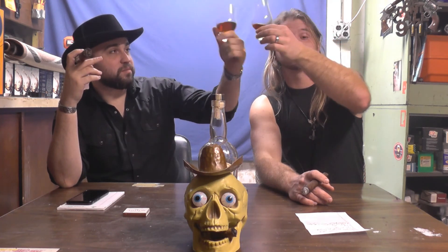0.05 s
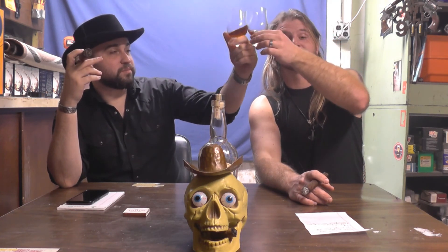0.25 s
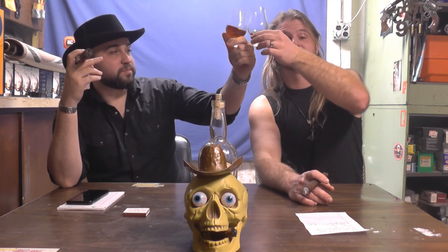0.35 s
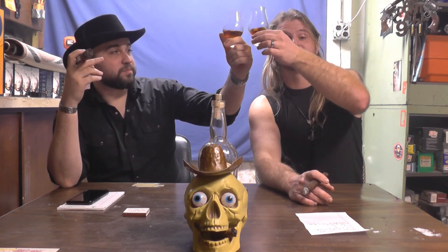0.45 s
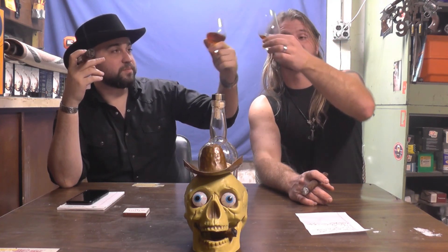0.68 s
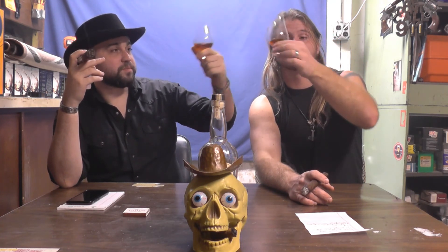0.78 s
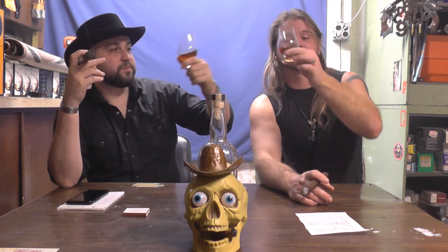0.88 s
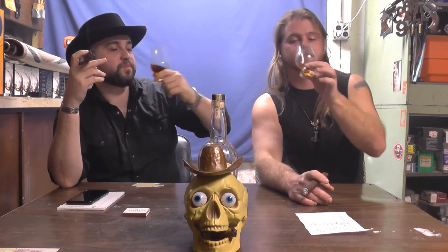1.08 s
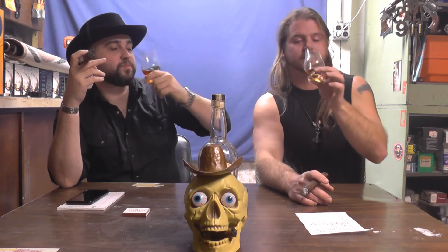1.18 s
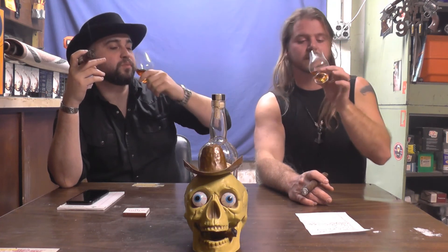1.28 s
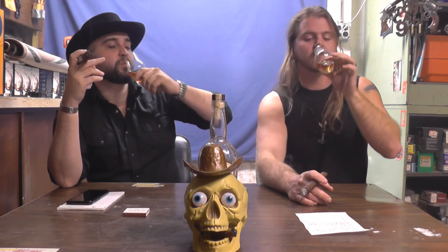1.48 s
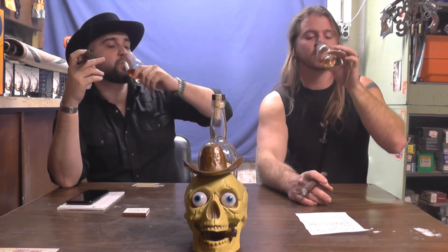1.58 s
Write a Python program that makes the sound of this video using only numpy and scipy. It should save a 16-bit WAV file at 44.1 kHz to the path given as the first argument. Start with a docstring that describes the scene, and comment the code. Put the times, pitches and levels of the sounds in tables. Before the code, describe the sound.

Quiet room tone, then one crisp clink of drinking glasses with short room echoes; the clear, beating ring slowly dies and sags slightly, with a dull low rumble of movement and a faint late tick, in stereo.

```python
"""A small room's tone comes first and runs throughout, in stereo: coloured noise. Then two stemmed tasting
glasses clink once: a noise crack with a damped clack, a bright shimmer of high sines, a long beating ring of
sines, and a wash of room echoes. Each long partial swells and fades as the glasses are drawn apart through the
room's standing waves, and sags, the lowest ones most, as they are tipped. After the clink a soft low rumble of
the drinkers' movement rises, and late on comes a faint noise tick as a glass is handled."""
import sys
import numpy as np
from scipy.fft import rfft, irfft, next_fast_len
from scipy.io import wavfile
from scipy.ndimage import map_coordinates

SR = 44100
rng = np.random.default_rng(int(sys.argv[2]) if len(sys.argv) > 2 else 0)


def materialize(psi):
    """Save the field psi as 16-bit PCM at rate SR to the path in sys.argv[1].

    A 1-D psi becomes a single channel; in a 2-D psi each row is a channel.
    """
    bounded = np.clip(np.atleast_2d(psi).T, -1, 1)
    quanta = np.round(bounded * 32767).astype(np.int16)
    wavfile.write(sys.argv[1], SR, quanta)


N = 72765  # samples, 1.65 s
CLINK_S = 0.2297
DRIFT_RAD, DRIFT_PER_S = 0.55, 6  # phase wander of every glass partial: depth, random knots a second


def amp(db):
    """Decibels to gain."""
    return 10 ** (np.asarray(db) / 20)


def unit(x):
    """Scale to rms 1, over both channels together."""
    return x / np.sqrt(np.mean(x ** 2) + 1e-20)


def along(points, hz):
    """Interpolate (frequency, value) points on a log frequency axis."""
    f, v = np.transpose(points)
    return np.interp(np.log(hz + 1), np.log(f + 1), v)


def curves(rows):
    """One value per sample for each column after the time."""
    s, *columns = np.transpose(rows)
    return [np.interp(np.arange(N) / SR, s, column) for column in columns]


def since(start):
    """Seconds since start, zero before it."""
    return np.maximum(np.arange(N) / SR - start, 0)


def fade(t, t60):
    """Exponential decay, down 60 dB after t60 seconds."""
    return np.exp(-np.log(1000) * t / t60)


def rise(t, length):
    """Exponential approach to 1 with the time constant length."""
    return 1 - np.exp(-t / length)


def wobble(rate):
    """A smooth random curve for each channel, rate knots a second."""
    at = np.arange(N) * rate / SR
    knots = rng.standard_normal(size=(2, 256))
    return np.array([map_coordinates(channel, [at], mode="mirror") for channel in knots])


def filtered(x, response):
    """Shape the spectrum of x by a response of frequency."""
    m = next_fast_len(N + SR // 2)
    return irfft(rfft(x, m) * response(np.fft.rfftfreq(m, 1 / SR)), m)[..., :N]


def noise(spectrum, alike):
    """Coloured stereo noise of rms 1; the mid-to-side balance sets how alike left and right are."""
    def mid_side_gains(hz):
        turn = np.arccos(np.clip(along(alike, hz), -1, 1)) / 2
        return amp(along(spectrum, hz)) * [np.cos(turn), np.sin(turn)]

    mid, side = filtered(rng.standard_normal((2, N)), mid_side_gains)
    return unit(np.array([mid + side, mid - side]))


# left-right likeness of room tone and rumble: (frequency [Hz], correlation [-1 to 1])
ROOM_ALIKE = [(100, 0.89), (1000, 0.25), (4000, 0.19), (12000, 0.27)]
# colour of the room tone: (frequency [Hz], relative density [dB])
ROOM_TONE = [(15, -62.5), (25, -37), (70, -8.5), (189, -15.5), (228, -1.5), (382, -11.5), (500, -6),
             (955, -11), (1430, -13.5), (1780, -18.5), (2890, -24.5), (3220, -29), (6310, -23.5),
             (7830, -29.5), (15800, -26)]
# the tone sinks after the clink and creeps part of the way back: (time [s], level change [dB])
ROOM_TONE_DIP = [(.22, -3), (.3, -10), (.55, -8), (.85, -5), (1.65, -5)]
ROOM_TONE_DB = -48  # before the level change


def room_tone():
    """The small room's own noise, whose level sinks after the clink."""
    dip_db, = curves(ROOM_TONE_DIP)
    return amp(ROOM_TONE_DB + dip_db) * noise(ROOM_TONE, ROOM_ALIKE)


# contacts of the rims, a graze and then the clink: (time [s], level before CRACK_DB [dB])
CONTACTS = [(.2279, -39), (.2297, -19)]
# colour of the crack: (frequency [Hz], relative density [dB])
CRACK = [(40, 0.5), (110, 6.5), (230, -6), (320, 2), (420, -18.5), (700, 12), (1000, -3.5), (1400, -13),
         (2000, -4.5), (3500, -0.5), (4700, -9), (6100, -0.5), (8000, -11.5), (9500, 3.5), (12000, -13.5),
         (15800, -13)]
# left-right likeness of the crack: (frequency [Hz], correlation [-1 to 1])
CRACK_ALIKE = [(500, 0.94), (10000, 1)]
CRACK_DB, CRACK_T60_S = 7.5, 0.041  # gain added to every contact, decay
CLACK_HZ, CLACK_DB, CLACK_T60_S = 1418, -9.5, 0.038
CLACK_DELAY_S = 0.000735  # after the clink


def strike():
    """The rims graze, then meet: decaying noise for the broad crack, a quickly damped sine for the clack."""
    t = since(CLINK_S + CLACK_DELAY_S)
    clack = amp(CLACK_DB) * fade(t, CLACK_T60_S) * np.sin(2 * np.pi * CLACK_HZ * t)
    bursts = 0
    for start, db in CONTACTS:
        elapsed = since(start)
        bursts = bursts + amp(db) * (elapsed > 0) * fade(elapsed, CRACK_T60_S)
    return clack + amp(CRACK_DB) * bursts * noise(CRACK, CRACK_ALIKE)


# pitches of the short high glass partials: [Hz]
SHORT_HZ = [2858, 2945, 3484, 4955, 6004, 6063, 6245, 7520, 8905, 8947, 9165, 9630, 10184, 10752, 12204,
            13500]
# a row for each pitch: (level before envelope and flutter [dB rms], rise [s], hold [s], t60 [s])
SHORT_MODES = [(-52, .01, 0.14, 1.9), (-58.5, .01, 0.14, 2.8), (-49, .01, 0.33, 1.1),
               (-50.5, .005, 0.16, .42), (-31, 0.00045, 0.021, 0.46), (-24.5, 0.00034, 0.069, 0.3),
               (-25, 0.011, 0.077, 0.28), (-48.5, .002, 0.066, 0.22), (-40, 0.00082, .04, 0.31),
               (-31, 0.00087, 0.021, 0.38), (-38.5, .015, .05, .23), (-41, .001, 0.031, 0.26),
               (-37.5, 0.00081, 0.052, 0.35), (-47, 0.0018, .08, 0.34), (-47, .03, 0.12, .17),
               (-56, 0.0029, .08, .22)]
FLUTTER, FLUTTER_PER_S = 0.48, 55  # depth relative to the tone, random knots a second


def shimmer():
    """High glass partials rise quickly, stay level briefly, then die away; each one flutters."""
    t, out = since(CLINK_S), 0
    for hz, (db, rise_s, hold_s, t60) in zip(SHORT_HZ, SHORT_MODES):
        # the complex factor flutters both level and phase
        flutter = 1 + FLUTTER * (wobble(FLUTTER_PER_S) + 1j * wobble(FLUTTER_PER_S))
        phase = 2 * np.pi * hz * t + DRIFT_RAD * wobble(DRIFT_PER_S)
        tone = np.sqrt(2) * np.imag(flutter * np.exp(1j * phase))
        envelope = rise(t, rise_s) * fade(since(CLINK_S + hold_s), t60)
        out = out + amp(db) * envelope * tone
    return out


# long partials on their way through the room: (time [s], level [dB], left minus right [dB])
RING_LOW = [(0.24, -67, 1), (0.288, -22, 3), (0.298, -33, 9), (0.359, -42, -27), (0.419, -48.5, 5),
            (0.7, -35.5, -10.5), (0.84, -28, -6.5), (0.932, -30.5, -5), (1.061, -41.5, -3),
            (1.15, -35.5, -4.5), (1.251, -35.5, -8.5), (1.38, -45.5, 0), (1.56, -41, -5), (1.63, -49, -6.5)]
RING_MID = [(0.24, -16, 1), (0.279, -31, -7), (0.31, -63, 4), (0.319, -30, 8), (0.421, -25.5, 0.5),
            (0.491, -31, 0), (0.61, -24.5, -0.5), (0.752, -25.5, 5.5), (0.85, -36, 7.5), (0.949, -33, 4),
            (1.09, -42.5, 0), (1.16, -56, 9), (1.32, -53, -12), (1.42, -40, 9.5), (1.629, -46, -7.5)]
RING_HIGH = [(0.24, -54, -7), (0.3, -32, -2), (0.34, -52, -18), (0.481, -35, -7), (0.58, -36, 10.5),
             (0.62, -50, -12), (0.651, -46.5, 14), (0.681, -33, -4), (0.83, -37.5, 1), (0.92, -44, -9.5),
             (1.05, -42, 11), (1.14, -56, 19), (1.19, -52, -10), (1.24, -42, -2), (1.63, -53.5, 11)]
OVERTONE_LOW = [(0.238, -31, 3), (0.27, -53, -2), (0.29, -34, 1), (0.351, -31.5, -8), (0.38, -47, -6),
                (0.46, -29, -2.5), (0.602, -28, -0.5), (0.67, -34.5, 3.5), (0.74, -53, -7.5),
                (1.051, -61.5, 3), (1.19, -72.5, -1)]
OVERTONE_HIGH = [(0.24, -31, -0.5), (0.33, -22, 0), (0.358, -37.5, 9), (0.411, -29.5, 3), (0.5, -34.5, 2),
                 (0.62, -51.5, -2.5), (0.679, -47, 3), (0.849, -51.5, -1.5), (0.919, -71, 8),
                 (1.0, -61.5, 2), (1.05, -79, 3)]
# their pitches, in the same order: (frequency [Hz], sag when fully tipped [Hz])
LONG_MODES = [(1429, 12), (1472.5, 14), (1531, 34), (3525, 6), (3606, 6)]
TIP_START_S, TIP_LENGTH_S = 0.85, 0.823
LAST_T60_S = 0.64  # decay after the last point of each path


def ring():
    """The long partials beat against each other and sag as the drink runs up the tipped bowls."""
    t, out = since(CLINK_S), 0
    tipped = (since(TIP_START_S) / TIP_LENGTH_S) ** 2
    paths = [RING_LOW, RING_MID, RING_HIGH, OVERTONE_LOW, OVERTONE_HIGH]
    for (hz, sag_hz), path in zip(LONG_MODES, paths):
        level_db, pan_db = curves(path)
        stereo_db = level_db + np.array([pan_db, -pan_db]) / 2
        sag_cycles = sag_hz * np.cumsum(tipped) / SR
        phase = 2 * np.pi * (hz * t - sag_cycles) + DRIFT_RAD * wobble(DRIFT_PER_S)
        dying = fade(since(path[-1][0]), LAST_T60_S)
        out = out + amp(stereo_db) * dying * np.sqrt(2) * np.sin(phase)
    return out * rise(t, 0.001)


# colour of the echoes before the room's speckle: (frequency [Hz], relative density [dB])
WASH = [(100, -30), (420, -17.5), (560, -7.5), (740, 4.5), (1100, -3), (1500, -1), (2100, -2.5),
        (3200, -10.5), (4400, -20.5), (5400, -16), (6300, -4.5), (7300, -8), (8100, -27), (9100, 1.5),
        (11400, -19.5), (12400, -7), (15800, -18.5)]
# left-right likeness of echoes and tick: (frequency [Hz], correlation [-1 to 1])
WASH_ALIKE = [(500, 0.66), (2000, 0.72), (6000, 0.23), (12000, 0.25)]
WASH_DB, WASH_RISE_S = -22.5, 0.002  # starting level before rise and grain
WASH_HOLD_S, WASH_SLOPE_DB_PER_S, WASH_T60_S = 0.1, 68.5, 0.27  # early stretch and its fall, then the tail
SPECKLE_DB, SPECKLE_HZ = 4, 30.04  # room resonances colour the echoes: depth, spacing
GRAIN_DB, GRAIN_PER_S = 1.5, 130  # single echoes stand out: depth, random knots a second


def wash():
    """The room answers the crack with noise: dense early echoes, then a short tail."""
    t = since(CLINK_S)
    grain_db = GRAIN_DB * wobble(GRAIN_PER_S)[0]
    early_db = WASH_DB - WASH_SLOPE_DB_PER_S * np.minimum(t, WASH_HOLD_S) + grain_db
    peaks = rng.standard_normal(size=2048)

    def speckle(hz):
        return amp(SPECKLE_DB * map_coordinates(peaks, [hz / SPECKLE_HZ], mode="mirror"))

    echoes = unit(filtered(noise(WASH, WASH_ALIKE), speckle))
    tail = fade(since(CLINK_S + WASH_HOLD_S), WASH_T60_S)
    return amp(early_db) * rise(t, WASH_RISE_S) * tail * echoes


# colour of the drinkers' movement: (frequency [Hz], relative density [dB])
MOVEMENT = [(30, -20.5), (70, -10), (140, 2.5), (200, -4), (280, -15.5), (340, -6), (450, -20), (900, -24),
            (2000, -60), (8000, -88.5)]
# level of the low rumble before its lumps: (time [s], level [dB])
MOVEMENT_LEVEL = [(0, -61.5), (.72, -67), (.8, -47), (.95, -60.5), (1.1, -44.5), (1.32, -52), (1.42, -52.5),
                  (1.55, -49.5), (1.65, -50)]
LUMPS_DB, LUMPS_PER_S = 1.6, 26  # unevenness of the rumble: depth, random knots a second


def movement():
    """An uneven low rumble rises after the clink as arms and bodies move: dark noise of wandering level."""
    level_db, = curves(MOVEMENT_LEVEL)
    lumps_db = LUMPS_DB * wobble(LUMPS_PER_S)[0]
    return amp(level_db + lumps_db) * noise(MOVEMENT, ROOM_ALIKE)


# colour of the tick: (frequency [Hz], relative density [dB])
TICK = [(200, -19.5), (1500, -24), (2900, 4.5), (4200, -11), (6000, 4.5), (9000, -25), (15000, -30)]
TICK_S, TICK_DB, TICK_T60_S = 1.473, -53, 0.053  # start, level before the envelope, decay


def tick():
    """A faint dry tick as a glass is handled: a short noise burst."""
    t = since(TICK_S)
    return amp(TICK_DB) * rise(t, 0.0012) * fade(t, TICK_T60_S) * noise(TICK, WASH_ALIKE)


def scene():
    """The toast in its small room, all layers summed."""
    clink = strike() + shimmer() + ring() + wash()
    return room_tone() + clink + movement() + tick()


TOP_HZ = 15780  # band limit


def record(dry):
    """The recorder clips at full scale, then cuts steeply above its band limit."""
    return filtered(np.clip(dry, -1, 1), lambda hz: 1 / np.sqrt(1 + (hz / TOP_HZ) ** 300))


dry = scene()
out = record(dry)
materialize(out)
```